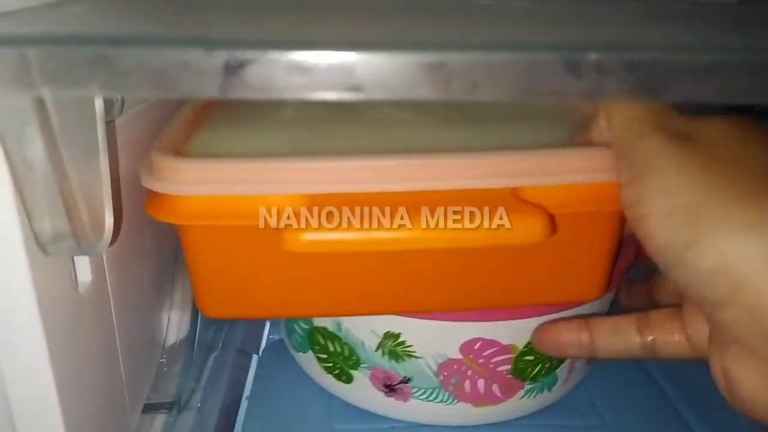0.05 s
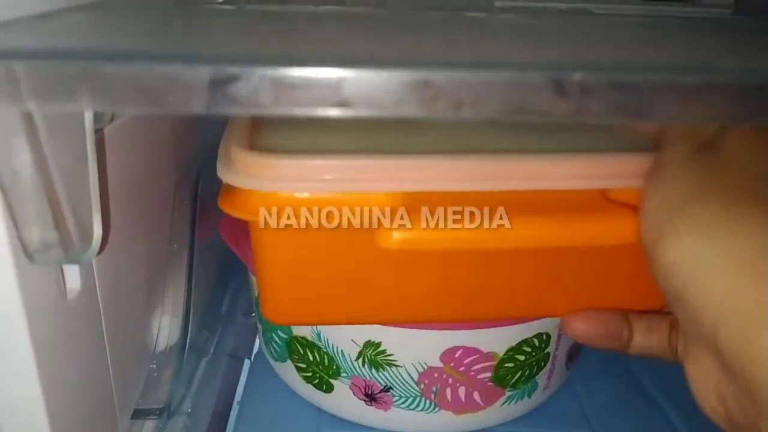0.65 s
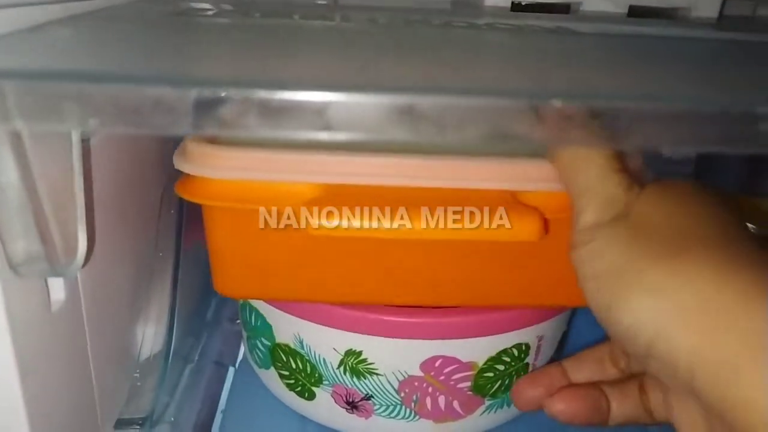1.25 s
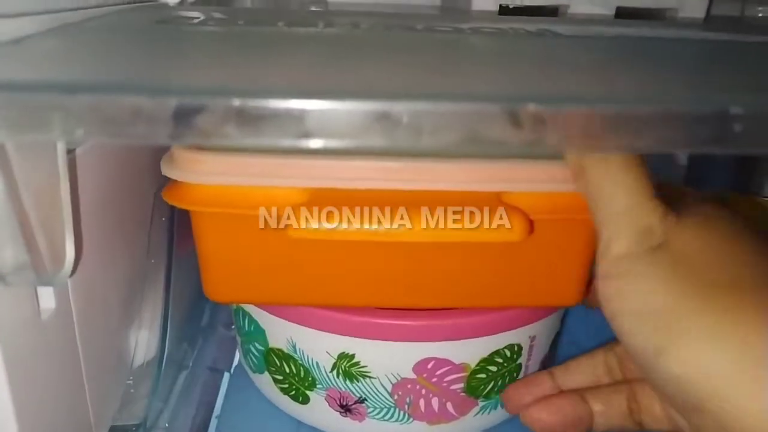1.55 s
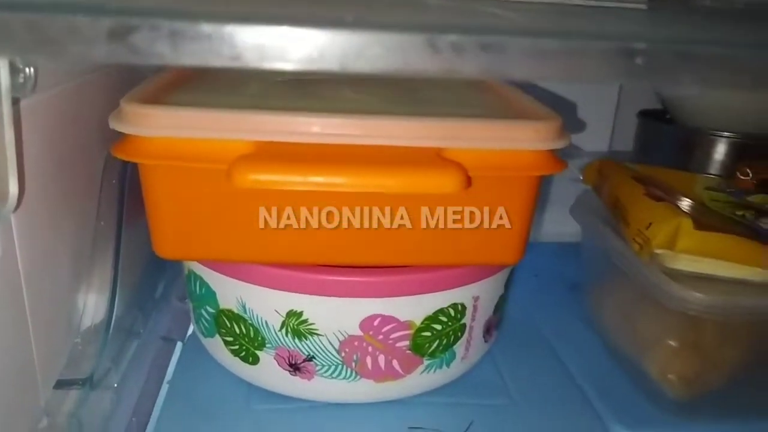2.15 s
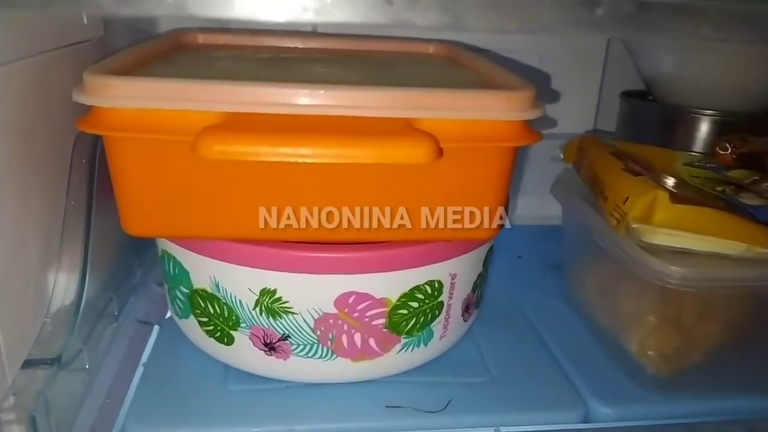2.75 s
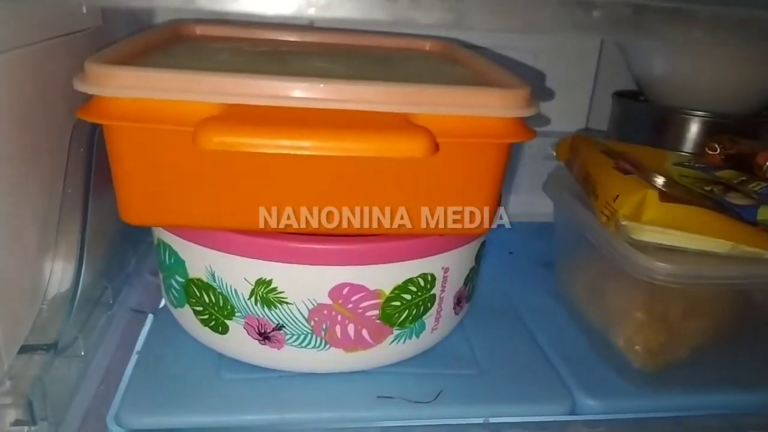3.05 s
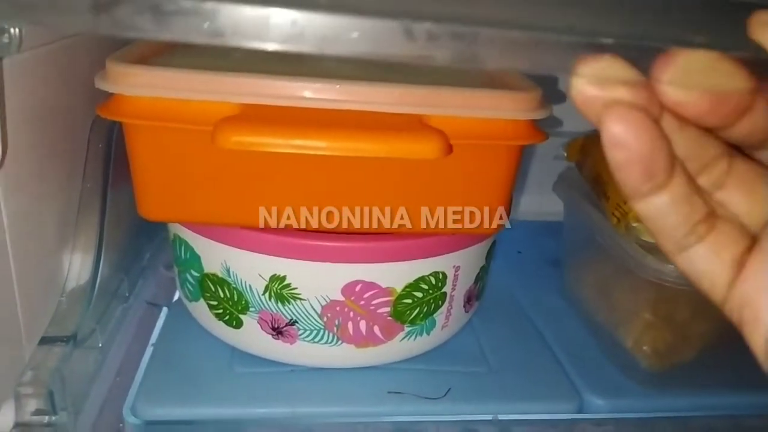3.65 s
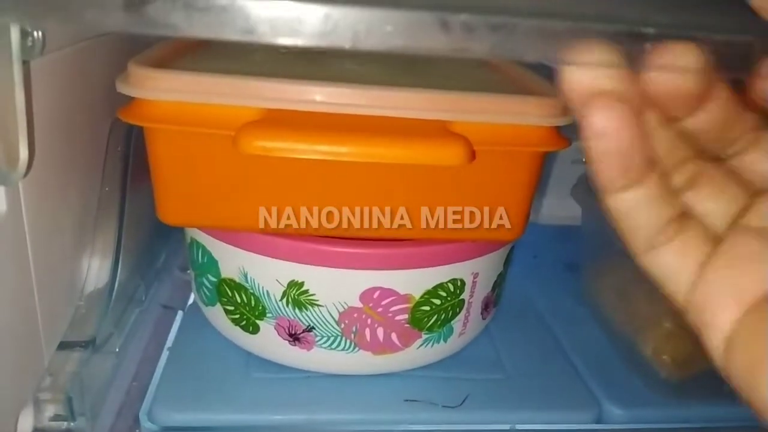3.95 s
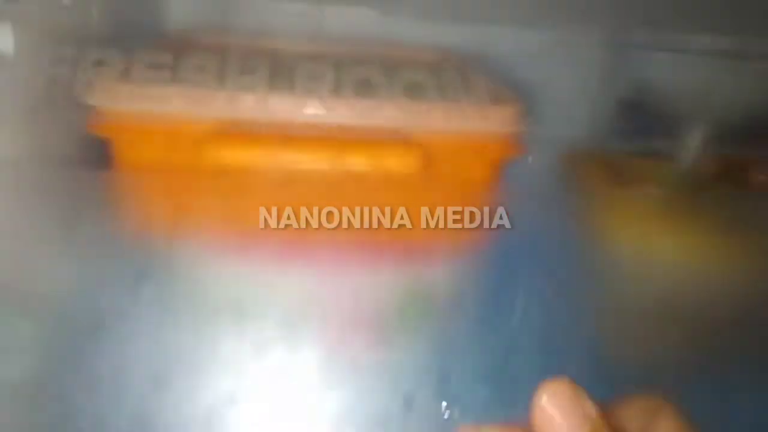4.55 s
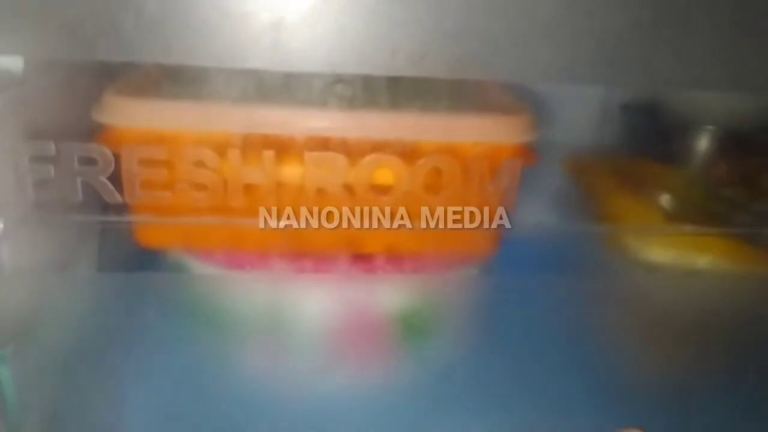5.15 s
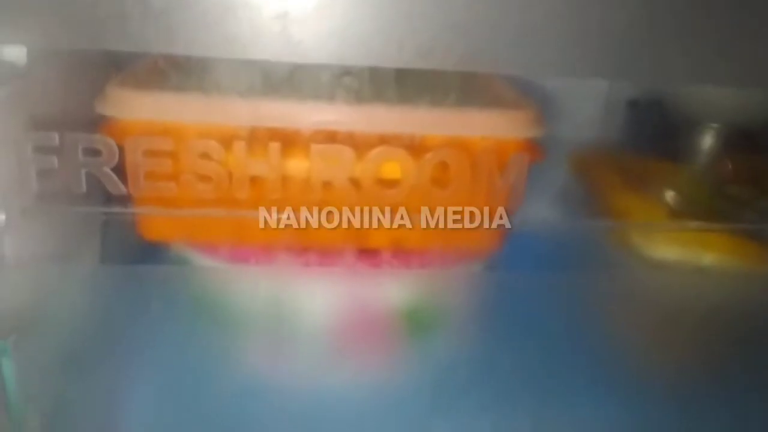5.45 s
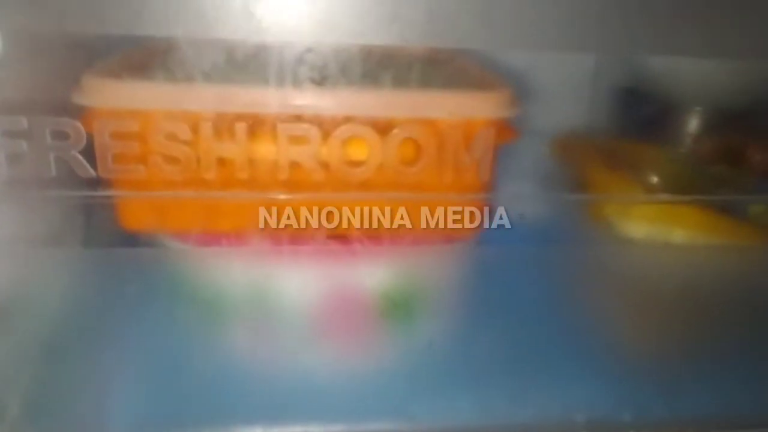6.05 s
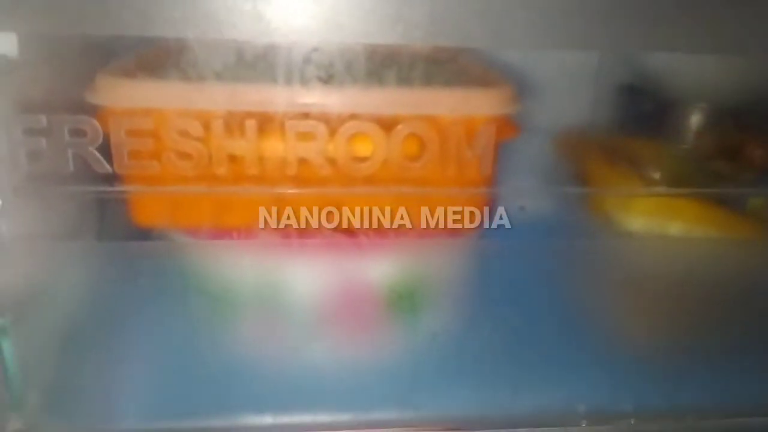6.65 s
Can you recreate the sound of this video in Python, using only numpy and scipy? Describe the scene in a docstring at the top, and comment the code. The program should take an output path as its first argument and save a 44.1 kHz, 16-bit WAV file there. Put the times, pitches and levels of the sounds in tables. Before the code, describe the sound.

A hollow plastic scrape and a few small knocks come first as one food container is stacked on another, heard from close by over a quiet refrigerator hum. After a short lull, a hinged plastic flap is worked loose with rubbing and sharp rattling clacks, then knocks shut, briefly ringing the boxy cabinet. Near the end a faint high whine rises and the hum drops off.

```python
"""A plastic food tub scrapes onto another and settles with a click, over a refrigerator's hum.
A hand then pulls the compartment's clear flap over its catch and lets it clack shut.
Small stick-slips make the scrape and the rubbing; each blow rings the flap and the boxy cabinet.
Near the end a thin whine swells, then the hum falls away with a tick."""
import sys
import numpy as np
from scipy import signal
from scipy.fft import rfft, irfft
from scipy.io import wavfile

SR = 44100
rng = np.random.default_rng(int(sys.argv[2]) if len(sys.argv) > 2 else 0)


def wav_record(signal):
    """Record a signal, one row per channel, as 16-bit PCM in the file named by sys.argv[1]."""
    frames = np.transpose(np.atleast_2d(signal))
    bounded = np.clip(frames, -1, 1)
    # unit amplitude maps onto the largest positive 16-bit level
    quanta = np.round(bounded * 32767).astype(np.int16)
    wavfile.write(sys.argv[1], SR, quanta)


N = 304290


def amp(db):
    return 10 ** (np.asarray(db) / 20)


def unit_rms(x):
    return x / np.sqrt(np.mean(x ** 2) + 1e-20)


def curve_at(points, hz):
    """Interpolate (Hz, value) points on a log-frequency axis."""
    point_hz, value = np.transpose(points)
    return np.interp(np.log(hz + 1), np.log(point_hz), value)


def add(mix, start_s, sound):
    part = mix[:, max(round(start_s * SR), 0):]
    part[:, :sound.shape[1]] += sound[:, :part.shape[1]]


def stereo_noise(correlation, size):
    """White noise whose left-right correlation follows a curve."""
    a, b = rfft(rng.standard_normal((2, size)))
    alike = np.clip(curve_at(correlation, np.fft.rfftfreq(size, 1 / SR)), -1, 1)
    mid, side = a * np.sqrt((1 + alike) / 2), b * np.sqrt((1 - alike) / 2)
    return irfft([mid + side, mid - side], size)


def colour(x, spectrum, size=4096):
    """Minimum-phase filter through (Hz, dB) points."""
    log_gain = np.log(amp(curve_at(spectrum, abs(np.fft.fftfreq(size, 1 / SR)))))
    taps = np.fft.ifft(np.exp(np.conj(signal.hilbert(log_gain)))).real
    return signal.oaconvolve(x, taps[None, :size // 2], axes=1)[:, :x.shape[1]]


def gesture(start_s, rise_s, length_s, db, release_s, sag_db_per_s):
    """Gain envelope: smooth rise, sagging hold, exponential release."""
    t = np.arange(N) / SR - start_s
    attack = np.sin(np.pi / 2 * np.clip(t / rise_s, 0, 1)) ** 2
    hold = amp(db + sag_db_per_s * np.clip(t, 0, length_s))
    return attack * hold * np.exp(-np.maximum(t - length_s, 0) / release_s)


def softened(x, rise_s):
    """Soft plastic takes a moment to bite."""
    return x * (1 - np.exp(-np.arange(x.shape[1]) / SR / rise_s))


def ring(modes, rise_s, size=32768):
    """Decaying modes, each with its own left-over-right phase lead."""
    t, sides = np.arange(size) / SR, np.array([[.5], [-.5]])
    out = np.zeros((2, size))
    for k, (hz, db, t60_s, lead) in enumerate(modes):
        out += amp(db - 60 * t / t60_s) * np.sin(2 * np.pi * hz * t + sides * lead + k * k)
    return softened(out, rise_s)


# Compressor lines. Each row: multiple of shaft speed, level in dB, left phase lead in rad.
HUM_LINES = [(1, -61, 0.055), (2.01, -60, 0.011), (3.034, -56, 0), (4.017, -58, 0.43), (5.01, -58.5, 0.76),
             (9.005, -58.5, 0.83), (11.01, -65.5, 0.93), (15.5, -68, 0.98)]
# Spectra of moving air and of the whine. Each row: frequency in Hz, relative level in dB.
AIR_SPECTRUM = [(20, -12.5), (58, -10), (80, -16.5), (110, -7.5), (165, 0), (230, -7.5), (310, -14.5),
                (385, -12.5), (480, -18.5), (800, -20), (1000, -25), (2700, -34), (4000, -41),
                (6800, -42.5), (8600, -35), (11000, -39), (13000, -47), (16000, -69.5)]
WHINE_SPECTRUM = [(1500, -27.5), (2000, -3), (2430, -0.5), (2550, -9), (2720, 0), (3300, -27.5)]
# Stereo image of both. Each row: frequency in Hz, left-right correlation.
AIR_CORRELATION = [(30, 0.36), (160, 1), (300, 0.91), (500, 0.31), (900, -0.076)]


def fridge(shaft_hz=48.55, whistle_hz=2428, drop_s=6.615, fall_s=0.03):
    """Wavering compressor lines over rushing air and a thin whine; all sink slowly, then drop."""
    t = np.arange(N) / SR
    hum = np.zeros((2, N))
    for multiple, db, lead in HUM_LINES:
        waver = unit_rms(sum(np.sin(2 * np.pi * (hz * t + rng.random())) / np.sqrt(hz)
                             for hz in np.geomspace(.3, 6, 12)))
        turns = multiple * shaft_hz * t + rng.random()
        phase = 2 * np.pi * turns + 0.16 * waver + lead * np.array([[.5], [-.5]])
        hum += amp(db) * np.sqrt(2) * np.cos(phase)
    air = amp(-47) * unit_rms(colour(stereo_noise(AIR_CORRELATION, N), AIR_SPECTRUM))
    swell = gesture(start_s=5.58, rise_s=0.75, length_s=0.79, db=-68, release_s=0.29, sag_db_per_s=-2.5)
    whine_band = unit_rms(colour(stereo_noise(AIR_CORRELATION, N), WHINE_SPECTRUM))
    whistle = amp(-5) * np.sin(2 * np.pi * whistle_hz * t)
    whine = (amp(-76.5) + swell) * (whine_band + whistle)
    running_db = 1.17 - 0.2 * t - 14 * np.clip((t - drop_s) / fall_s, 0, 1)
    return (hum + air + whine) * amp(running_db) * amp([[.55], [-.55]])


# Early reflections. Each row: left delay in seconds, right delay in seconds, gain in dB.
WALL_ECHOES = [(.0011, 0.0017, -16), (.0027, 0.002, -11), (.0046, 0.003, -9.5)]


def wall_echoes(x):
    """Echoes off the close walls comb a sound."""
    out = x.copy()
    for left_s, right_s, db in WALL_ECHOES:
        add(out, left_s, amp(db) * x * [[1], [0]])
        add(out, right_s, amp(db) * x * [[0], [1]])
    return out


# Compartment decay. Each row: frequency in Hz, T60 in seconds.
COMPARTMENT_T60 = [(100, 0.091), (400, 0.56), (1000, 0.21), (2500, 0.22), (6000, .13), (14000, 0.13)]
# Stereo image of a burst. Each row: frequency in Hz, left-right correlation.
BURST_CORRELATION = [(100, 0.33), (300, 1), (500, -0.18), (850, 0.26), (1250, -0.9), (2200, -0.048)]


def burst(spectrum, t60_s, tail_db, size=16384):
    """Crowded plastic modes die fast; the compartment walls add a longer tail."""
    t = np.arange(size) / SR
    hz, frame_s, bands = signal.stft(stereo_noise(BURST_CORRELATION, size), SR, nperseg=256)
    decay = amp(-60 * frame_s / curve_at(COMPARTMENT_T60, hz)[:, None])
    tail = signal.istft(bands * decay, SR, nperseg=256)[1][:, :size]
    direct = stereo_noise(BURST_CORRELATION, size) * amp(-60 * t / t60_s)
    blow = wall_echoes(colour(direct + amp(tail_db) * tail, spectrum))
    return blow / np.sqrt(np.mean(blow[:, :130] ** 2))  # unit rms over the first 3 ms


# Finger and hinge strokes. Each row: start, rise and length in seconds, level in dB.
STROKES = [(0.113, .015, 0.048, -45), (0.756, .03, 0.037, -49.5), (2.18, 0.011, 0.071, -54),
           (3.16, 0.052, 0.11, -47.5), (3.377, 0.016, 0.035, -33), (3.826, 0.026, 0.065, -51.5),
           (4.117, 0.0066, 0.24, -34), (4.175, 0.03, 0.033, -26.5), (4.395, 0.11, 0.17, -37),
           (4.598, 0.045, 0.043, -40), (4.71, 0.11, 0.16, -37), (4.923, 0.11, 0.092, -48.5)]
# Rubbed thin plastic. Each row: frequency in Hz, relative level in dB.
RUB_SPECTRUM = [(150, 0.5), (450, 5), (2500, -7), (4500, -9), (6500, -10.5), (9000, -3), (11300, -2),
                (12800, -10.5), (15500, -17.5)]


def rubbing(slips_per_s=4000, spots_per_s=18, spot_count=5):
    """Fine slips of hand and flap sound thin plastic; the colour shifts as the contact wanders."""
    pressure = sum(gesture(*row, release_s=0.034, sag_db_per_s=-18) for row in STROKES)
    slips = (rng.random(N) < slips_per_s / SR) * rng.standard_normal(N)
    spot = (spots_per_s * np.arange(N) / SR + rng.random(N)).astype(int) % spot_count
    sound = np.zeros((2, N))
    for k in range(spot_count):
        response = burst(RUB_SPECTRUM, t60_s=0.016, tail_db=-29)
        sound += signal.oaconvolve((slips * (spot == k))[None], response, axes=1)[:, :N]
    return unit_rms(sound) * pressure


def stick_slip(slips_per_s, spread_db):
    """Rough gain from small random slips of uneven strength."""
    slips = rng.random(N) < slips_per_s / SR
    strength = amp(spread_db * np.minimum(rng.exponential(1, N), 4))
    return np.sqrt(unit_rms(np.convolve(slips * strength, np.hanning(64), "same")) + .5)


# Pushes on the tub. Each row: start, rise and length in seconds, scrape level in dB.
PUSHES = [(0, 0.0021, 0.11, -37.5), (0.124, 0.052, 0.4, -45), (0.499, 0.083, 0.22, -42.5),
          (0.92, 0.023, 0.062, -52), (1.04, 0.045, 0.19, -56.5)]
# Spectra of tub body, sliding hiss and stack judder. Each row: frequency in Hz, relative level in dB.
SCRAPE_SPECTRUM = [(40, -36), (170, -10), (300, -2), (450, 0.5), (650, -2), (800, 2), (1050, 0),
                   (1400, -8.5), (5000, -29.5), (15000, -68)]
HISS_SPECTRUM = [(1000, 1.5), (3000, -1.5), (5500, -5), (9200, -1.5), (10300, 4.5), (11700, -5.5),
                 (15500, -13.5)]
JUDDER_SPECTRUM = [(50, -47), (76, -19), (87, 13), (98, -12), (140, -47)]


def tub_slide():
    """Slips of the tub's base sound its hollow body; judder grows as the stack takes the weight."""
    t = np.arange(N) / SR
    centred = [(100, 1.0), (3000, 0.93)]  # Hz, left-right correlation
    body_slips = stereo_noise(centred, N) * stick_slip(slips_per_s=900, spread_db=1.4)
    hiss_slips = stereo_noise(centred, N) * stick_slip(slips_per_s=830, spread_db=3.5)
    body = unit_rms(colour(body_slips, SCRAPE_SPECTRUM))
    hiss = unit_rms(colour(hiss_slips, HISS_SPECTRUM))
    judder = unit_rms(colour(stereo_noise(centred, N), JUDDER_SPECTRUM, size=16384))
    push = sum(gesture(*row, release_s=0.033, sag_db_per_s=-3) for row in PUSHES)
    weight = amp(-16.5 + 19 * np.minimum(t, 1))
    return push * (body + weight * judder) + hiss * amp(-49.5 - 16.5 * t)


# Tub rim modes. Each row: frequency in Hz, level in dB, T60 in seconds, left phase lead in rad.
RIM_MODES = [(780, -7, 0.15, .5), (1630, 0, 0.05, 1.6), (2550, 5.5, 0.031, .9), (2780, 2, 0.024, 1.2),
             (3410, -2, 0.044, 1.2)]


def rim_snap(start_s=.801):
    """The tub's rim snaps past its neighbour and rings."""
    out = np.zeros((2, N))
    add(out, start_s, amp(-34) * ring(RIM_MODES, rise_s=0.0012, size=8000))
    return out


# Dense modes of the plastic. Each row: frequency in Hz, relative level in dB.
CLACK_SPECTRUM = [(60, -32), (300, -1.5), (600, -1), (1200, 1.5), (2000, -1.5), (3300, -8.5), (4000, -12),
                  (5200, -11.5), (6500, -18), (15000, -52)]


def overtones(count=28):
    """A scatter of high flap modes; the highest die soonest."""
    hz = np.geomspace(1900, 12500, count) * rng.uniform(.97, 1.03, count)
    db = curve_at(CLACK_SPECTRUM, hz) + 3 * np.clip(rng.standard_normal(count), -2, 1.5)
    t60_s = 0.078 * (hz / 2000) ** -.3
    lead = rng.uniform(-np.pi, np.pi, count)
    return ring(zip(hz, db, t60_s, lead), rise_s=0.0022, size=12000)


# Light clicks. Each row: start in seconds, level in dB, relative treble in dB.
TICKS = [(0.0524, -34.5, 5.5), (0.097, -34.5, -22), (0.164, -40.5, -3), (0.8008, -29, 8),
         (0.847, -39.5, -0.5), (1.5674, -51, 1.5), (3.203, -42.5, 0.5), (3.317, -35.5, -5),
         (3.341, -42, -2.5), (3.355, -33, -6), (3.378, -31, -7), (3.388, -24, 3), (3.437, -33.5, -17),
         (3.5426, -26, -2.5), (3.5782, -28.5, -4), (4.119, -30.5, 0.5), (4.254, -32, -14),
         (4.498, -35.5, 7.5), (4.596, -30, -5.5), (6.6349, -50, -4)]
# Spectra of a light click and of its treble snap. Each row: frequency in Hz, relative level in dB.
CLICK_SPECTRUM = [(100, -24), (450, -5), (850, 1.5), (1300, 4.5), (1650, -3.5), (2050, -0.5), (2600, -0.5),
                  (5200, -10.5), (8000, -13.5), (15000, -29.5)]
SNAP_SPECTRUM = [(1500, -38.5), (4000, -10.5), (6500, -4), (8500, 0.5), (11000, 5), (12500, -5),
                 (15500, -22.5)]


def ticks():
    """Light clicks of rims, nails and hinge; the last is a faint tick as the hum drops."""
    out = np.zeros((2, N))
    high_ring = amp(-15.5) * overtones()
    for start_s, db, treble_db in TICKS:
        click = burst(CLICK_SPECTRUM, t60_s=0.028, tail_db=-17.5)
        treble = amp(treble_db) * burst(SNAP_SPECTRUM, t60_s=0.028, tail_db=-20)
        add(out, start_s, amp(db) * softened(click + treble, rise_s=0.0012))
        add(out, start_s, amp(db) * high_ring)
    return out


# Soft thuds. Each row: start in seconds, level in dB, first and last pitch in Hz, length in seconds.
THUDS = [(0.097, -34.5, 466, 149, 0.054), (0.851, -31.5, 289, 128, 0.046), (0.979, -34.5, 386, 112, 0.027),
         (3.411, -20.5, 186, 94, 0.02), (4.658, -30.5, 227, 170, 0.047), (4.878, -20, 153, 140, 0.017)]


def thuds(glide_s=0.0166):
    """The note of a tub or the flap sinks as the plastic takes a load."""
    out = np.zeros((2, N))
    for start_s, db, first_hz, last_hz, length_s in THUDS:
        t = np.arange(0, length_s, 1 / SR)
        hz = last_hz + (first_hz - last_hz) * np.exp(-t / glide_s)
        tone = np.sin(2 * np.pi * np.cumsum(hz) / SR)
        add(out, start_s, amp(db) * np.sin(np.pi * t / length_s) * tone[None])
    return out


# Dull bumps. Each row: start in seconds, level in dB.
BUMPS = [(.098, -30), (3.485, -37), (3.548, -31), (4.5982, -20)]
# Thump of a hollow plastic box. Each row: frequency in Hz, relative level in dB.
THUMP_SPECTRUM = [(30, -26), (70, -22.5), (120, -9.5), (170, 0.5), (450, -2.5), (800, 1.5), (1100, -10.5),
                  (2500, -24.5), (15000, -67.5)]
CONTACT_RISE_S = 0.0014


def bumps():
    """Bumps against the hollow tub and the flap give short, dull thumps."""
    out = np.zeros((2, N))
    for start_s, db in BUMPS:
        thump = burst(THUMP_SPECTRUM, t60_s=0.04, tail_db=-16.5)
        add(out, start_s, amp(db) * softened(thump, CONTACT_RISE_S))
    return out


# Hollow raps. Each row: start in seconds, level in dB, note in Hz, T60 in seconds.
RAPS = [(.0965, -29.5, 1300, 0.037), (.836, -37, 1254, .05), (.979, -32, 580, 0.031),
        (.9785, -48, 1250, 0.027), (3.3545, -44, 2680, 0.05), (3.3885, -18.5, 839.5, .15),
        (3.4035, -19, 554, 0.058), (3.5785, -33, 2010, 0.036), (4.168, -19.5, 1176, 0.038),
        (4.2095, -14, 2607, 0.046), (4.2115, -17.5, 700, 0.13), (4.2255, -11.5, 3094, 0.024),
        (4.2305, -5, 706, 0.027), (4.2315, -11.5, 480, .04), (4.588, -19, 697, 0.022),
        (4.5975, -20, 716, 0.064), (4.857, -13.5, 2353, 0.066), (4.8655, -10, 760, 0.065),
        (5.843, -49.5, 3210, 0.053)]
# Modes of a rapped spot. Each row: multiple of the note, relative level in dB.
SPOT_MODES = [(.88, -6.5), (1, 0.5), (1.13, -13.5)]


def raps(lead_rad=0.7):
    """A spot of plastic rings briefly in a few close modes; the note depends on the spot hit."""
    out = np.zeros((2, N))
    for start_s, db, hz, t60_s in RAPS:
        modes = [(hz * multiple, mode_db, t60_s, lead_rad) for multiple, mode_db in SPOT_MODES]
        add(out, start_s, amp(db) * ring(modes, rise_s=0.00088, size=8000))
    return out


# Frame modes. Each row: frequency in Hz, level in dB, T60 in seconds, left phase lead in rad.
FRAME_MODES = [(404, -9.5, 0.35, .5), (495, -15, .2, 2.5), (572, -8.5, .26, 0.2), (650, -7.5, .13, 1),
               (739, 3, 0.1, 0.8), (783, 1, 0.077, 1.5), (938, -8.5, 0.24, 1), (980, -15.5, 0.29, 1.5),
               (1224, 7, 0.073, 3)]


def flap_landing(start_s=4.8595):
    """The falling flap lands on its frame and rings it."""
    out = np.zeros((2, N))
    add(out, start_s, amp(-13) * ring(FRAME_MODES, rise_s=0.0029))
    return out


# Modes of the cabinet, the wall panels and the flap.
# Each row: frequency in Hz, level in dB, T60 in seconds, left phase lead in rad.
CABINET_MODES = [(118, 3, 0.13, -0.097), (147, 4, 0.2, 0.76), (164.6, 7.5, 0.13, 0.0), (188, -4, 0.66, 0.4),
                 (215.8, -1.5, .36, .3), (244.4, 4.5, 0.13, 0.44)]
PANEL_MODES = [(297, -0.5, 0.21, 0.57), (322.7, -1.5, 0.1, -0.13), (387.7, -4, 0.12, .3),
               (408, -7, 0.25, 0.53), (488, 0.5, 0.13, -0.78), (569, -3, 0.19, -0.95),
               (612, -6.5, 0.094, -1.6), (710, -2, 0.11, 1)]
FLAP_MODES = [(760, -11, 0.14, 2), (828.3, 1, 0.15, 0), (855, -5, 0.14, 1.9), (930, -8.5, 0.13, 4.5),
              (1014, -9, 0.11, -4), (1129, -0.5, 0.054, 7.5), (1263, 4, 0.12, 4), (1555, -8.5, 0.047, 4.5),
              (1936, -12, 0.11, -1.5), (2405, -12, 0.055, 0), (3210, -11, 0.09, 3.5)]
# Flap blows. Each row: start in seconds, force on the flap in dB, force on the cabinet in dB,
# pitch ratio of the bent flap (1 at rest).
FLAP_BLOWS = [(3.387, -18, -22, 1.02), (3.4027, -22.5, -35.5, 1.06), (3.4158, -33.5, -24.5, 1),
              (4.1415, -28, -42.5, 1.16), (4.1639, -19, -32.5, 0.95), (4.1874, -21, -28, 1.16),
              (4.2094, -9.5, -29.5, 1.06), (4.2247, -10, -25, 0.99), (4.2314, -24.5, -24.5, 0.96),
              (4.244, -41, -32, 1.2), (4.3128, -28.5, -30.5, 1), (4.4943, -35.5, -33.5, 1.1),
              (4.588, -29, -29, 1.2), (4.5972, -30.5, -29, .95), (4.6642, -50, -38, 1.1),
              (4.855, -9.5, -32, 1.03), (4.8606, -12, -12.5, 0.63), (4.866, -15, -18, 0.73),
              (4.8834, -46.5, -18.5, 1)]


def flap_knocks(free_until_s=4.4, damped_db=-13.5):
    """Each blow snaps, clacks and rings the flap; the cabinet thumps, booms and rings its panels."""
    out = np.zeros((2, N))
    high_ring = amp(-15.5) * overtones()
    boom = amp(-7) * ring(CABINET_MODES, rise_s=.011)
    panels = amp(-2.5) * ring(PANEL_MODES, rise_s=.003)
    for start_s, flap_db, cabinet_db, bend in FLAP_BLOWS:
        bent_modes = [(hz * bend, *rest) for hz, *rest in FLAP_MODES]
        ring_db = -4.5 + damped_db * (start_s > free_until_s)
        flap_ring = amp(ring_db) * ring(bent_modes, rise_s=.0025, size=14000)
        clack = burst(CLACK_SPECTRUM, t60_s=0.053, tail_db=-14)
        snap = amp(-13) * burst(SNAP_SPECTRUM, t60_s=0.069, tail_db=-32) * amp([[2], [-.5]])
        thump = amp(-6.5) * burst(THUMP_SPECTRUM, t60_s=0.1, tail_db=-15)
        for part in (softened(clack + snap, CONTACT_RISE_S), flap_ring, high_ring):
            add(out, start_s, amp(flap_db) * part)
        for part in (softened(thump, rise_s=0.002), boom, panels):
            add(out, start_s, amp(cabinet_db) * part)
    return out


def scene():
    """Flap, tubs and hand over the running refrigerator."""
    impacts = flap_knocks() + flap_landing() + raps() + ticks() + rim_snap() + thuds() + bumps()
    return impacts + tub_slide() + rubbing() + fridge()


# Right-channel treble loss. Each row: frequency in Hz, gain in dB.
RIGHT_ROLLOFF = [(9000, 0), (11300, -1.3), (13500, -3)]


def record(dry, ceiling=.8, cutoff_hz=15600):
    """Dull the top of the right channel, round off the loudest peaks, low-pass."""
    heard = np.vstack([dry[:1], colour(dry[1:], RIGHT_ROLLOFF)])
    rounded = heard / (1 + (heard / ceiling) ** 6) ** (1 / 6)
    lowpass = signal.firwin(401, cutoff_hz, window=("kaiser", 9), fs=SR)
    return signal.oaconvolve(rounded, lowpass[None], "same")


dry = scene()
out = record(dry)
wav_record(out)
```